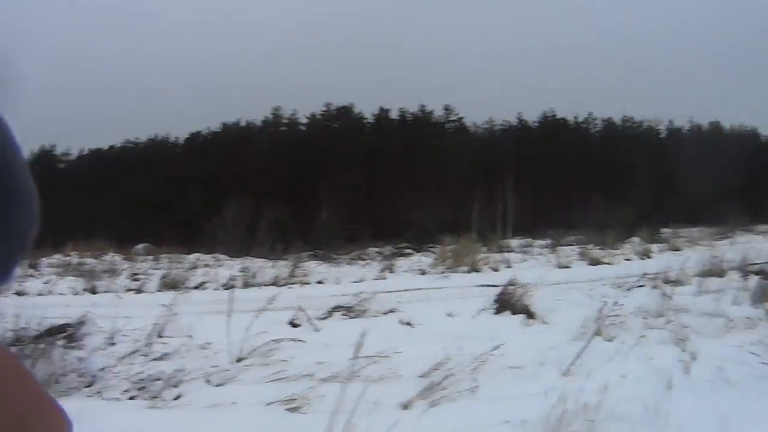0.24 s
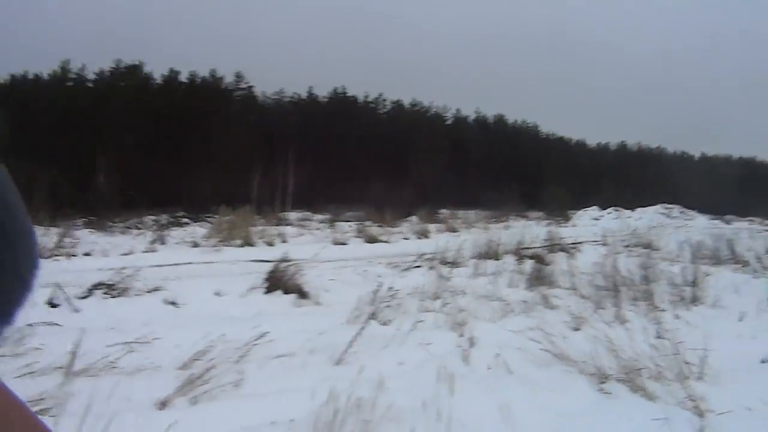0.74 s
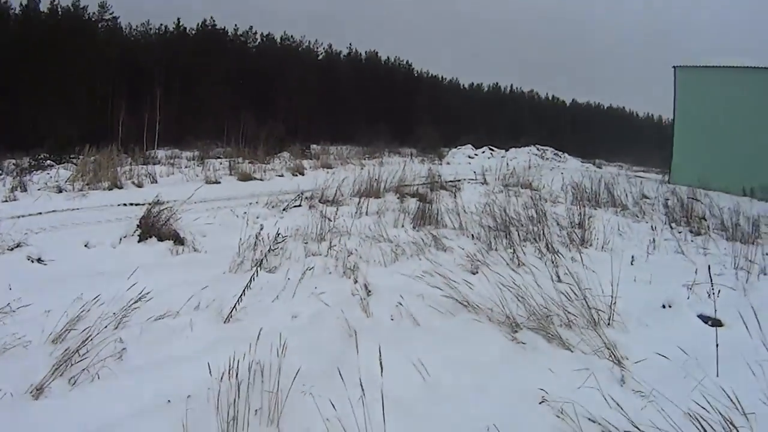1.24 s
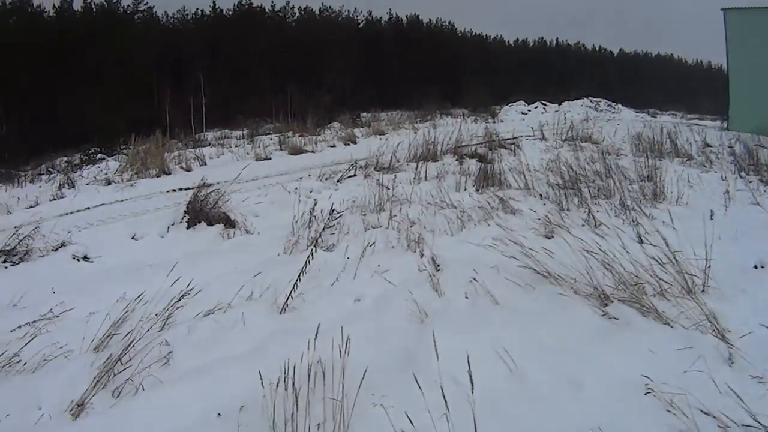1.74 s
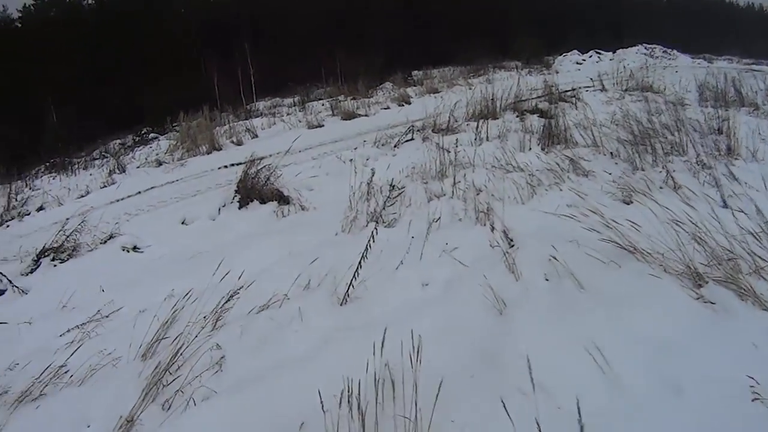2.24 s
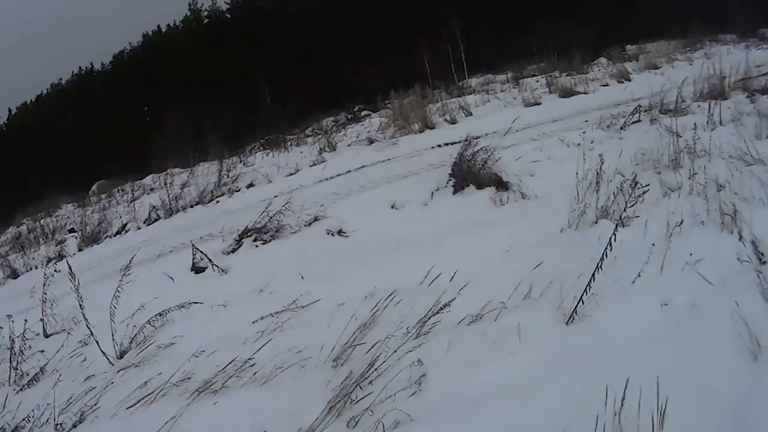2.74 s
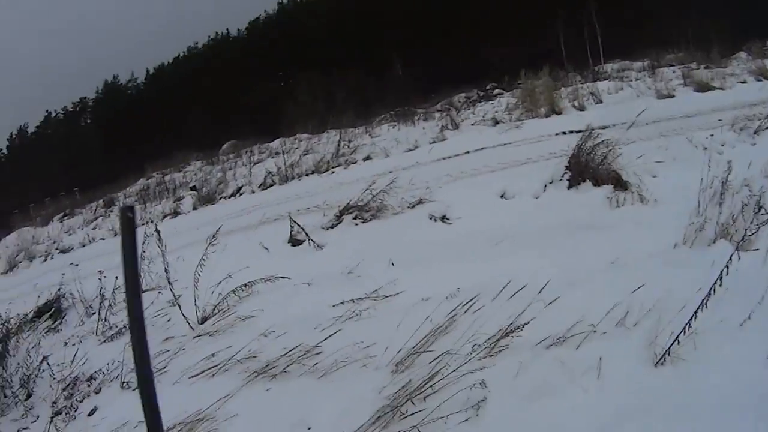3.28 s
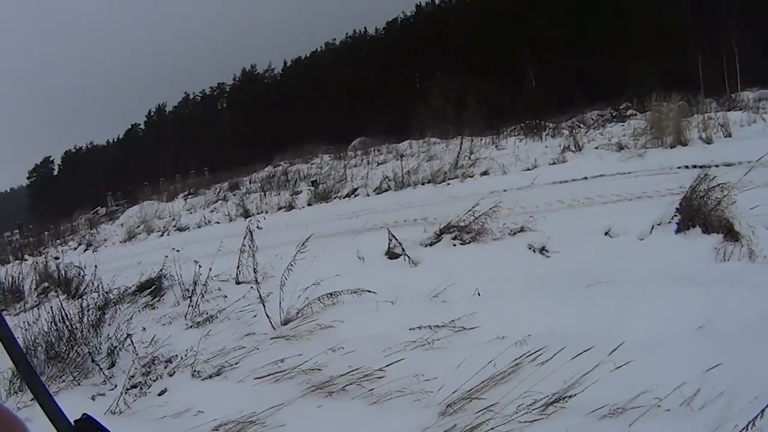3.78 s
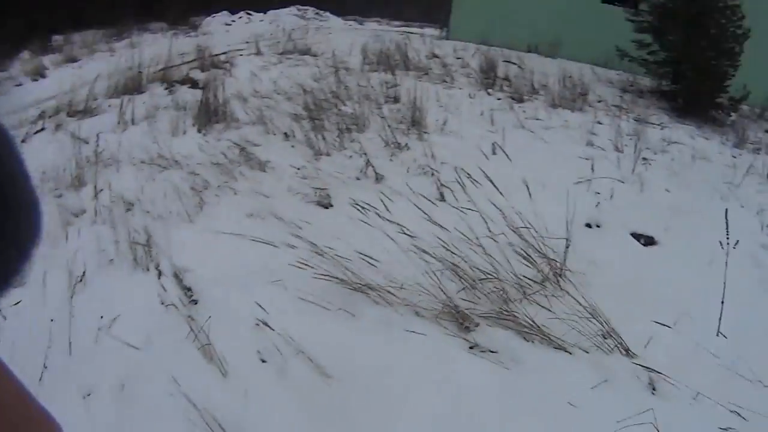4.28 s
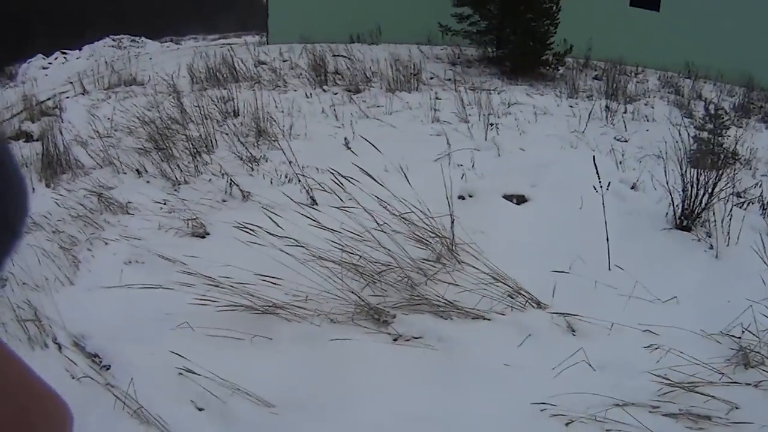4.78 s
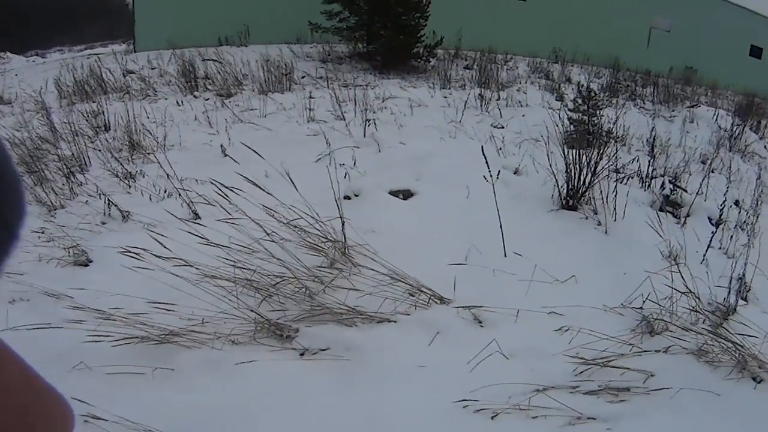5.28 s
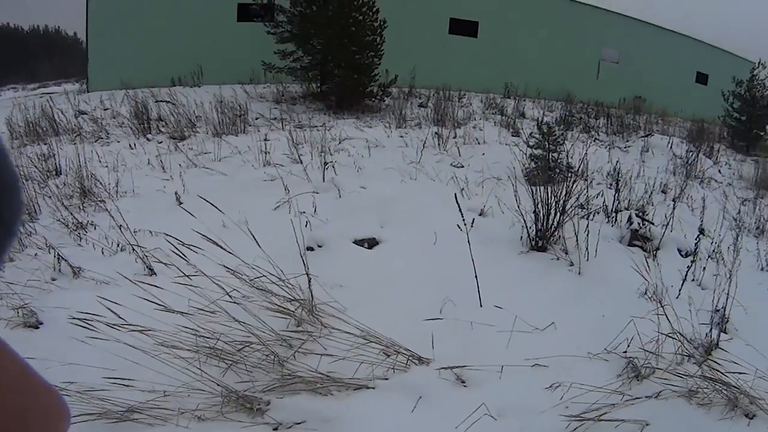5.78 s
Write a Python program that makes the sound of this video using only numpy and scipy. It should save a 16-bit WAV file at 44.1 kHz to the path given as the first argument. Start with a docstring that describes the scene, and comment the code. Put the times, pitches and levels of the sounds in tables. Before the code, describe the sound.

Someone in a heavy coat steps slowly through snow and dry stalks in an open winter field. Crisp, quiet crunches and tiny bright snaps come in clusters, with pauses between. Low thumps jolt the body-worn microphone. Around four seconds a hard hollow clack jumps out very close, with sleeve swishes around it, then only a few soft crunches over light wind and steady hiss.

```python
"""Slow steps through snow and dry grass

Boots crunch slowly through snow (random fractures, filtered) while dry stalks snap (excited modes).
A coat rustles and its sleeves swish (shaped noise); a hard body close by clacks once (modal ringing).
Each shift of the walker's weight jolts the microphone (a deep damped swing).
Light wind buffets it over a faint steady hiss with a thin whistle (coloured noise).
"""
import sys
import numpy as np
from scipy import signal
from scipy.fft import rfft, irfft, next_fast_len
from scipy.io import wavfile
from scipy.ndimage import uniform_filter1d, map_coordinates

SR = 44100
rng = np.random.default_rng(int(sys.argv[2]) if len(sys.argv) > 2 else 0)


def wrap_up_sound(samples):
    """Save the sound to the file named by the first command line argument, as 16-bit audio."""
    columns = np.atleast_2d(samples).T
    # keep every value between -1 and 1, then stretch to whole-number steps
    tamed = np.clip(columns, -1, 1)
    steps = np.round(tamed * 32767).astype(np.int16)
    wavfile.write(sys.argv[1], SR, steps)


N = 265305
T = np.arange(N) / SR  # time in s

# Wind buffets: start_s, level_db (BUFFET_GAIN_DB is added)
WIND_LEVELS = [(0.0, -59), (0.35, -55), (0.53, -61.5), (2.26, -65.5), (2.56, -54), (2.85, -62.5),
               (3.07, -60), (3.35, -53), (3.62, -62.5), (3.87, -63), (4.09, -57.5), (5.11, -67.5),
               (5.55, -57.5), (6.02, -66)]
BUFFET_GAIN_DB, HISS_DB = 3.5, -56.8
# The coat shifts with a low rustle: start_s, length_s, level_db
COAT_SHIFTS = [(0, 0.12, -57.5), (.11, 0.23, -51), (.39, 0.14, -52.5), (.56, 0.23, -57), (.91, 0.29, -60.5),
               (1.73, 0.12, -59), (2.34, 0.4, -62), (3.09, 0.061, -60), (4.86, 0.51, -66),
               (5.70, 0.067, -71)]
RUSTLE_ATTACK_S, RUSTLE_SAG_DB, RUSTLE_RELEASE_DB_PER_S = 0.049, 0.5, 100
# A sleeve slides along the coat: start_s, length_s, level_db
SLEEVE_SWINGS = [(1.87, 0.091, -55.5), (2.06, 0.21, -61), (3.49, 0.25, -58), (3.775, .19, -54.5),
                 (4.04, .15, -47), (4.25, .15, -52.5), (5.44, .32, -58.5), (5.90, .11, -60.5)]
SWING_ATTACK_S, SWING_SAG_DB, SWING_RELEASE_DB_PER_S = 0.044, 1.5, 130
# Narrow resonances of the swish: pitch_hz, width_hz, gain_db (over the broad rub)
SWISH_MODES = [(2650, 400, -3), (4800, 480, 6), (8550, 550, 5)]
# A boot presses into snow: start_s, length_s, core_level_db, attack_s, sag_db,
#   crisp_db and packed_db (relative to the core), crust_pitch_hz, crust_boost_db, left_minus_right_db
BOOT_PRESSES = [ (0.016, 0.023, -45, 0.0095, 1.5, -10, -8.5, 4660, 2, -2),
                (0.045, 0.13, -44.5, 0.11, 0, -2, -8.5, 4630, 8, -2),
                (0.185, 0.13, -44, 0.056, 2.5, -1, -10, 4630, 9, -2.5),
                (0.388, 0.055, -45.5, 0.038, 2, -2.5, -3, 4800, 12, 1.5),
                (0.773, 0.031, -43, 0.022, 1.5, -8, -15, 4900, 5, -1),
                (0.805, 0.24, -45, 0.019, 4.5, -3, -14, 4840, 10, 0),
                (1.030, 0.24, -50.5, 0.023, 6, -15, -11.5, 3350, 6.5, 1),
                (1.380, 0.057, -58, 0.022, 2.5, 0.5, -17, 4800, 6, -2),
                (1.490, 0.071, -47, 0.037, 1.5, -3, -10.5, 4900, 7, -2.5),
                (1.585, 0.17, -47.5, 0.068, 0.5, -1.5, -12, 4800, 8, -1.5),
                (1.770, 0.15, -57.5, 0.030, 2, -0.5, -6, 4800, 10.5, -0.5),
                (2.228, 0.18, -48, 0.044, 1, -3, -12.5, 4900, 3, -2),
                (2.395, 0.097, -45, 0.049, 2, 0.5, -11, 5000, 6, -2),
                (3.098, 0.33, -50, 0.007, 0.5, -7, -9, 5330, 10.5, -3.5),
                (3.491, 0.020, -62.5, 0.015, 0.5, -8, 6.5, 5300, 5, -3),
                (3.617, 0.013, -56, 0.0089, 0.5, -15, -0.5, 4700, 5, -3),
                (4.572, 0.052, -51, 0.009, -0.5, -16, -9.5, 5200, 6, -3),
                (4.642, 0.054, -43.5, 0.021, 1.5, -22, -9, 5200, 5.5, -3),
                (5.130, 0.35, -56, 0.12, 0, -4.5, -19, 5100, 8.5, 0), ]
SETTLE_DB_PER_S = 245  # the crunch dies once the boot stops
# Dry stalks break: start_s, level_db (lowered 4 dB), brightness_db (relative), left_minus_right_db
STALK_SNAPS = [(0.0266, -39, -27, -4.0), (0.248, -31, -18, -4), (0.2554, -26, -11, -0.5),
               (0.2622, -16, -9.5, 0), (0.2834, -26, -18, -1.5), (0.797, -23.5, -24.5, -4),
               (0.9004, -28, -25, 0.5), (1.0004, -36, -16, 0.5), (1.4735, -40, -29, -8),
               (1.634, -25.5, -18, -1.5), (2.5123, -31, -19.5, -3.0), (3.1038, -34, -28, -6),
               (3.1824, -43, -20, -3.5)]
# The walker's weight jolts the microphone: start_s, peak_db
WEIGHT_JOLTS = [(0.14, -50), (0.271, -46), (0.448, -42), (0.921, -44.5), (1.829, -45.5), (2.426, -38.5),
                (2.631, -43), (3.127, -32.5), (3.276, -41), (3.39, -36), (3.489, -43), (4.33, -50),
                (5.745, -42.5)]
JOLT_HZ, JOLT_RISE_S = 36.9, 0.014  # each jolt scales the pitch at random
# The hard blow and its rebounds: start_s, level_db (before CLACK_GAIN_DB)
BLOWS = [(4.0802, -1), (4.0827, -18.5), (4.0866, -16.5)]
CLACK_GAIN_DB = 25.5
# Modes of the hollow clacking body: pitch_hz, width_hz, level_db (before CLACK_GAIN_DB)
BODY_MODES = [(150, 200, -11.5), (450, 79, -6.5), (620, 130, -5), (842, 61, -1), (1005, 130, -4),
              (1240, 125, -0.5), (1575, 83, 1.5), (2090, 240, -5), (2590, 240, -13), (3450, 390, -18.5),
              (5110, 200, -16.5), (5830, 1050, -24.5), (7900, 500, -31)]
# Modes that linger after the blow: pitch_hz, start_level_db, t60_s
LINGERING_MODES = [(673, -46, .22), (1136, -44, .09)]

# Spectrum of breaking snow: frequency_hz, density_db (relative, per Hz)
SNOW_SPECTRUM = [(300, -28), (700, -20.5), (1200, -10.5), (1950, -13), (2350, 0.5), (2750, 4.5), (3150, -3),
                 (3600, -5), (6000, -9.5), (6800, -12.5), (7900, -10.5), (9400, -16), (10400, -26.5),
                 (10900, -20)]
# Spectrum of sliding cloth: frequency_hz, density_db (relative, per Hz)
CLOTH_SPECTRUM = [(600, -20), (1300, -10), (1950, -15), (2650, -3), (3400, -5.5), (5000, -5), (7200, -5),
                  (9200, -10), (10300, -15), (11000, -18)]
# Spectrum of wind buffeting: frequency_hz, density_db (relative, per Hz)
BUFFET_SPECTRUM = [(8, -6.5), (20, 0.5), (35, -4.5), (55, -11), (90, -18), (160, -43), (400, -62)]
# Spectrum of the coat's rustle: frequency_hz, density_db (relative, per Hz)
RUSTLE_SPECTRUM = [(40, -20), (80, 0), (160, -2), (270, -4.5), (380, -13.5), (550, -12), (1500, -33)]
# Spectrum of the steady hiss: frequency_hz, density_db (relative, per Hz)
HISS_SPECTRUM = [(30, 0), (150, 0), (400, -.5), (1100, -.5), (1900, -4.3), (2400, -3.5), (2750, -2),
                 (3100, -5.5), (4000, -8.7), (4650, -7.5), (5600, -10.5), (7500, -11), (9000, -13.8),
                 (11000, -14)]
# Agreement of the two microphone ports for near sounds: frequency_hz, coherence (0 to 1)
NEAR_COHERENCE = [(150, 1), (500, 0.74), (1800, 0.3), (2400, 0.91), (5000, 0.61), (10000, 0.75)]
# Agreement of the two ports for the hiss: frequency_hz, coherence (0 to 1)
DIFFUSE_COHERENCE = [(60, 0.99), (200, 0.36), (600, 0.56), (2000, 0.2), (2800, 0.67), (5000, 0.66),
                     (11000, 0.66)]
# Phase by which the left port leads: frequency_hz, lead_rad
PORT_LEAD = [(100, 0), (260, 0.82), (700, 3.5), (1460, 2.5), (2200, 0.06), (2700, 0.8), (4000, 0.52),
             (5500, 0), (8500, 0.26), (11000, 0.5)]
# Phase by which the left port leads for the clack: frequency_hz, lead_rad
CLACK_PORT_LEAD = [(150, .2), (300, .8), (450, 1.6), (860, 1.9), (1500, .7), (3500, .9), (5000, .5),
                   (11000, .3)]
TOP_HZ = 11130  # middle of the upper band edge


def amp(db):
    """Level law: amplitude grows tenfold per 20 dB."""
    return 10 ** (np.asarray(db) / 20)


def unit(x):
    """Normalization: scale the mean power to one."""
    return x / np.sqrt(np.mean(x ** 2) + 1e-20)


def along(points, hz):
    """Logarithmic frequency scale: join (frequency, value) points by straight lines."""
    f, v = np.transpose(points)
    return np.interp(np.log(hz + 1), np.log(f + 1), v)


def wobble(rate):
    """Slow random modulation: a smooth curve through `rate` random knots a second."""
    knots = rng.standard_normal(int(N * rate / SR) + 4)
    return map_coordinates(knots, [T * rate])


def filtered(x, response):
    """Linear filtering: multiply the spectrum by a complex response of frequency."""
    n = x.shape[-1]
    m = next_fast_len(n + 8192)  # room for the filter's tail
    spectrum = rfft(x, m) * response(np.fft.rfftfreq(m, 1 / SR))
    return irfft(spectrum, m)[..., :n]


def resonance(f, hz, width):
    """Damped oscillator: causal response of one mode, with gain one at its pitch."""
    return 1j * f * width / (hz * hz - f * f + 1j * f * width)


def ports(lead, f):
    """Interaural-style phase difference between the two ports, half on each side."""
    return np.exp(.5j * along(lead, f) * np.array([[1], [-1]]))


def stereo(pair, spectrum, coherence):
    """Partial coherence: mix two unrelated signals into a coloured left and right of rms 1."""
    def mid_side(f):
        angle = np.arccos(np.clip(along(coherence, f), 0, 1)) / 2
        return amp(along(spectrum, f)) * [np.cos(angle), np.sin(angle)]
    mid, side = filtered(pair, mid_side)
    left_right = np.array([mid + side, mid - side])
    return unit(filtered(left_right, lambda f: ports(PORT_LEAD, f)))


def balance(left_minus_right_db):
    """Level panning: share the level difference between left and right."""
    return amp([[left_minus_right_db / 2], [-left_minus_right_db / 2]])


def stroke(age, length, attack, sag_db, release_db_per_s):
    """Movement envelope: a swell, a sag while it lasts, then exponential decay."""
    rise = np.sin(np.pi / 2 * np.clip(age / attack, 0, 1)) ** 2
    sag = sag_db * np.clip(age / length, 0, 1)
    release = release_db_per_s * np.maximum(age - length, 0)
    return rise * amp(-sag - release)


def strokes(rows, attack, sag_db, release_db_per_s):
    """Power addition: the joint envelope of several alike movements."""
    power = 0
    for start, length, db in rows:
        power = power + (amp(db) * stroke(T - start, length, attack, sag_db, release_db_per_s)) ** 2
    return np.sqrt(power)


def air():
    """Turbulent noise: wind buffets the microphone over a steady hiss with a thin whistle."""
    buffet_db = np.interp(T, *np.transpose(WIND_LEVELS)) + BUFFET_GAIN_DB + 2.5 * wobble(10)
    in_phase = [(30, 1.0), (150, 1.0)]  # fully coherent
    buffet = amp(buffet_db) * stereo(rng.standard_normal((2, N)), BUFFET_SPECTRUM, in_phase)
    hiss = stereo(rng.standard_normal((2, N)), HISS_SPECTRUM, DIFFUSE_COHERENCE)
    hiss = amp(HISS_DB + 0.11 * wobble(3.72)) * hiss
    whistle = filtered(rng.standard_normal((2, N)), lambda f: resonance(f, 6750, 170) ** 2)
    return buffet + hiss + amp(-74.5) * unit(whistle)


def coat_rustle():
    """Friction noise: shifting heavy cloth radiates a low rustle."""
    shift = strokes(COAT_SHIFTS, RUSTLE_ATTACK_S, RUSTLE_SAG_DB, RUSTLE_RELEASE_DB_PER_S)
    noise = stereo(rng.standard_normal((2, N)), RUSTLE_SPECTRUM, NEAR_COHERENCE)
    return shift * amp(0.38 * wobble(25)) * noise


def fractures(n, rate, spread_db):
    """Impulsive noise: tiny breaks at random moments, with log-normal sizes capped above."""
    size = amp(spread_db * np.minimum(rng.standard_normal(n), 2.5))
    happens = rng.random(n) < rate / SR
    return unit(happens * size * rng.standard_normal((2, n)))


def patches(pair, depth_db):
    """Random spectral modulation: the colour shifts from one clump of snow to the next."""
    z = signal.stft(pair, nperseg=256)[2]
    field = rng.standard_normal(z.shape[1:])
    field = uniform_filter1d(field, size=4, axis=0)  # smooth over frequency
    field = uniform_filter1d(field, size=9, axis=1)  # smooth over time
    return signal.istft(z * amp(depth_db * unit(field)), nperseg=256)[1][:, :pair.shape[1]]


def crunch(n, crisp_db, packed_db, crust_hz, crust_db):
    """Brittle fracture: crystals break underfoot, packed snow sounding low and the crust crisp."""
    crystals = fractures(n, rate=11000, spread_db=1)
    flakes = fractures(n, rate=300, spread_db=1.0)  # bigger pieces of crust, heard one by one
    grains = stereo(patches(crystals + 0.27 * flakes, depth_db=1.56), SNOW_SPECTRUM, NEAR_COHERENCE)
    grains = filtered(grains, lambda f: 1 + (amp(crust_db) - 1) * resonance(f, crust_hz, width=630))
    low = lambda f: 1 / (1 + (f / 1900) ** 12)
    high = lambda f: 1 - 1 / (1 + (f / 6700) ** 10)
    packed = amp(packed_db) * unit(filtered(grains, low))
    crisp = amp(crisp_db) * unit(filtered(grains, high))
    core = unit(filtered(grains, lambda f: 1 - low(f) - high(f)))
    return packed + core + crisp


def footsteps():
    """Failure under load: snow gives way in clumps under each press of a boot, then settles."""
    out = np.zeros((2, N))
    age = np.arange(SR * 3 // 5) / SR
    for start, length, db, attack, sag_db, crisp_db, packed_db, crust_hz, crust_db, pan_db in BOOT_PRESSES:
        weight = amp(db) * stroke(age, length, attack, sag_db, SETTLE_DB_PER_S)
        press = weight * crunch(len(age), crisp_db, packed_db, crust_hz, crust_db)
        first = round(start * SR)
        out[:, first:first + len(age)] += press * balance(pan_db)
    clumps_db = 0.6 * wobble(70) + 0.6 * wobble(260)
    return out * amp(clumps_db)


def stalks():
    """Impulse excitation: thin stalks break with one bright tick, thick ones splinter, lower."""
    out = np.zeros((2, N))
    t = np.arange(2048) / SR
    for start, db, bright_db, pan_db in STALK_SNAPS:
        splinters = 0.056 * amp(-.7 * bright_db) * amp(-60 * t / 0.0049)  # decays 60 dB in 4.9 ms
        crack = (t == 0) + splinters * rng.standard_normal(len(t))

        def stalk_modes(f):
            treble = amp(bright_db + 9) * resonance(f, 7700, 4000)
            return resonance(f, 2570, 450) - 0.43 * resonance(f, 6000, 1400) + treble

        tick = filtered(crack, stalk_modes)
        tick = amp(db - 4) * tick / np.abs(tick).max()
        first = round(start * SR)
        out[:, first:first + len(t)] += tick * balance(pan_db)
    return filtered(out, lambda f: ports(PORT_LEAD, f))


def jolts():
    """Damped oscillation: each shift of weight gives the microphone one soft, deep swing."""
    out = np.zeros(N)
    for start, db in WEIGHT_JOLTS:
        age = np.maximum(T - start, 0)
        swell = age / JOLT_RISE_S
        hz = JOLT_HZ * rng.uniform(0.73, 1.24)
        out += amp(db) * swell * np.exp(1 - swell) * np.sin(2 * np.pi * hz * age)
    return out


def sleeve_swish():
    """Friction of fine fibres: dense tiny catches excite the sleeve's narrow resonances."""
    swing = strokes(SLEEVE_SWINGS, SWING_ATTACK_S, SWING_SAG_DB, SWING_RELEASE_DB_PER_S)
    rub = stereo(fractures(N, rate=14000, spread_db=1.0), CLOTH_SPECTRUM, NEAR_COHERENCE)
    modes = lambda f: 1 + sum(amp(db) * resonance(f, hz, width) for hz, width, db in SWISH_MODES)
    return swing * amp(0.6 * wobble(38)) * unit(filtered(rub, modes)) * balance(1)


def scatter(age, delay, t60):
    """Diffuse reflection: after a delay, noise dies away by 60 dB in t60 seconds."""
    since = np.maximum(age - delay, 0)
    return (age > delay) * amp(-60 * since / t60) * rng.standard_normal((2, N))


def clack():
    """Modal ringing: a blow and rebounds excite a hollow body; walker and ground scatter it back."""
    age = np.maximum(T - BLOWS[0][0], 0)
    blows = np.zeros(N)
    for start, db in BLOWS:
        blows[round(start * SR)] = amp(db)
    walker = amp(-33.5) * scatter(age, delay=.008, t60=.048)
    ground = amp(-36.5) * scatter(age, delay=.0195, t60=.042)
    echoes = filtered(walker + ground, lambda f: 1 / (1 + 1j * f / 2400))  # duller than the blow

    def struck_body(f):
        contact = 1 / np.sqrt(1 + (f / 6500) ** 6)  # the contact time dulls the top
        body = 0
        for k, (hz, width, db) in enumerate(BODY_MODES):
            body = body + (-1) ** k * amp(db) * resonance(f, hz, width)  # signs alternate
        return contact * body * ports(CLACK_PORT_LEAD, f)

    ring = sum(amp(db - 60 * age / t60) * np.sin(2 * np.pi * hz * age) for hz, db, t60 in LINGERING_MODES)
    return amp(CLACK_GAIN_DB) * filtered(blows + echoes, struck_body) + ring


def scene():
    """Superposition: the sources add in open air."""
    return air() + coat_rustle() + footsteps() + stalks() + jolts() + sleeve_swish() + clack()


def record(dry):
    """Band limitation: nothing passes above a 120 Hz wide edge around TOP_HZ."""
    return filtered(dry, lambda f: np.clip((TOP_HZ - f) / 120 + .5, 0, 1))


dry = scene()
out = record(dry)
wrap_up_sound(out)
```